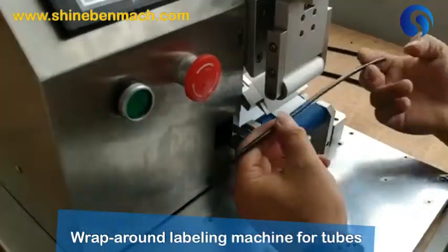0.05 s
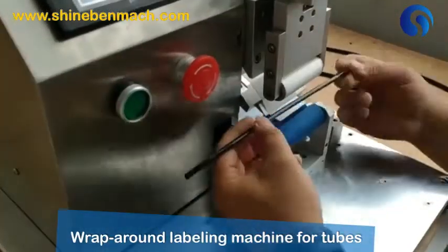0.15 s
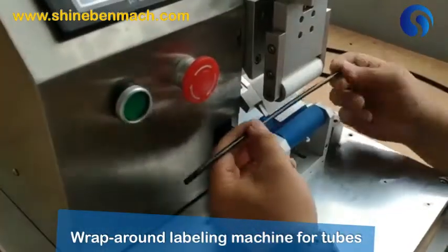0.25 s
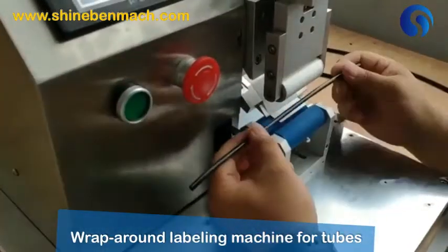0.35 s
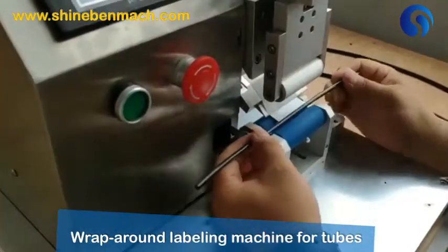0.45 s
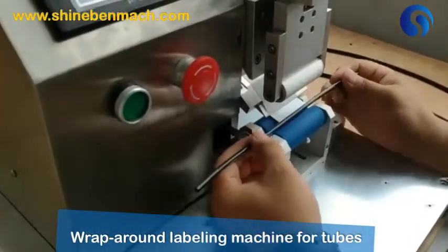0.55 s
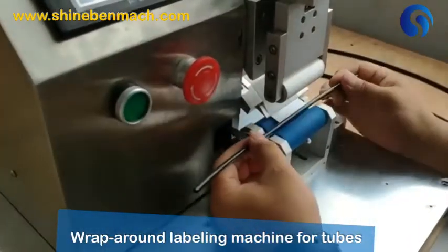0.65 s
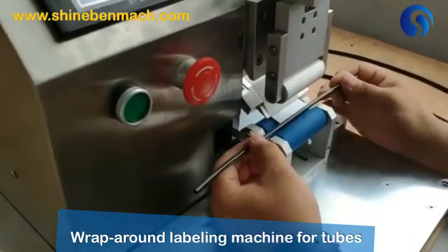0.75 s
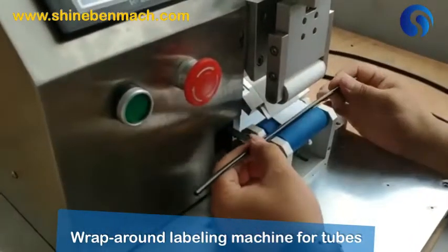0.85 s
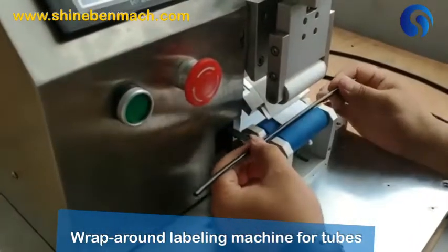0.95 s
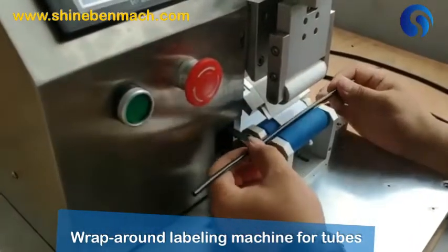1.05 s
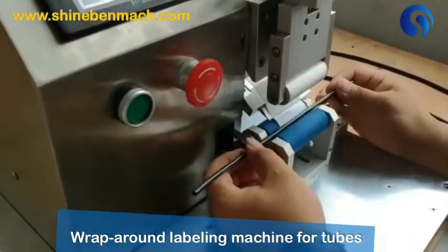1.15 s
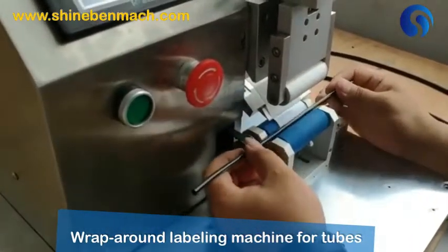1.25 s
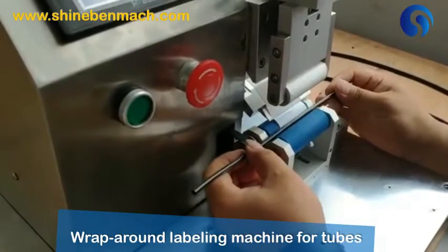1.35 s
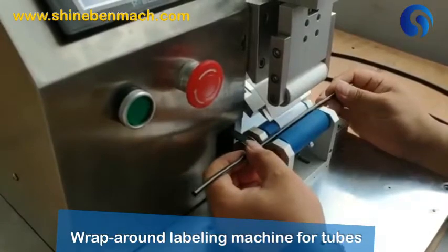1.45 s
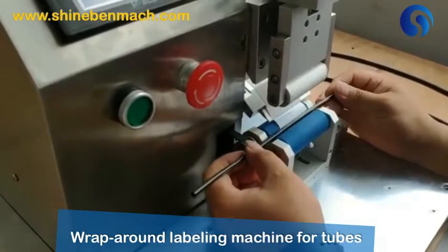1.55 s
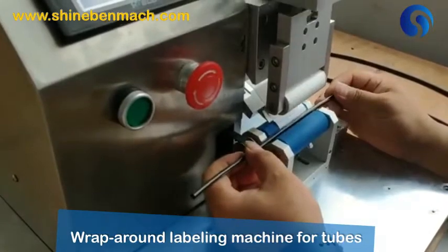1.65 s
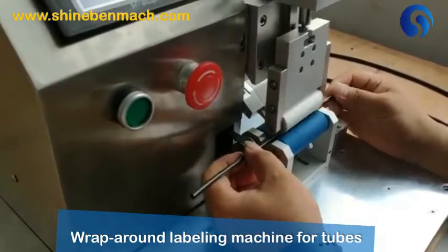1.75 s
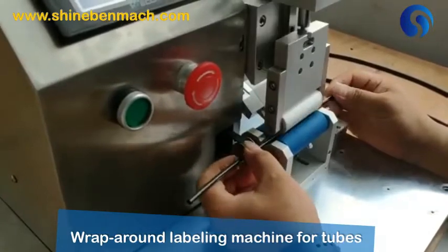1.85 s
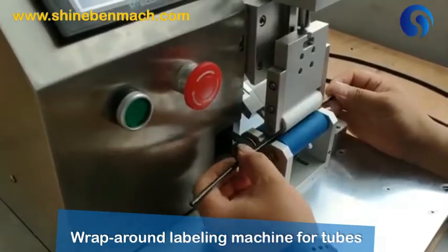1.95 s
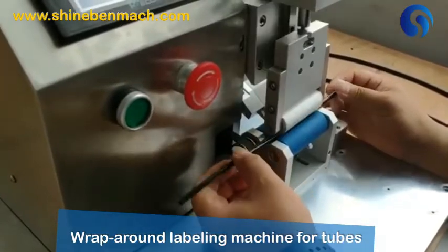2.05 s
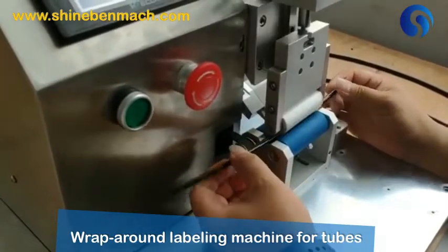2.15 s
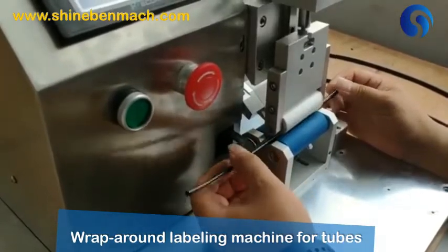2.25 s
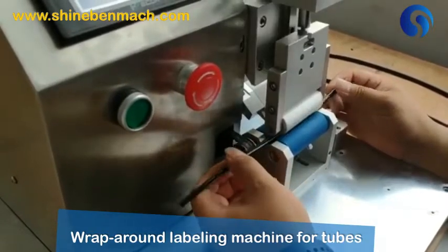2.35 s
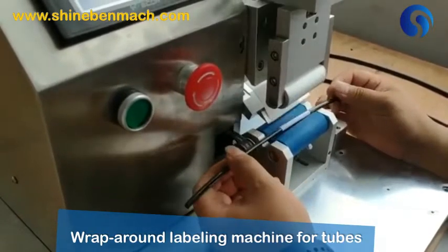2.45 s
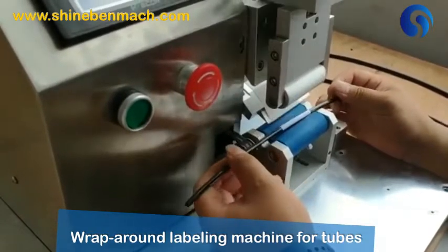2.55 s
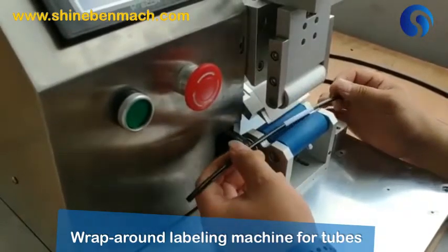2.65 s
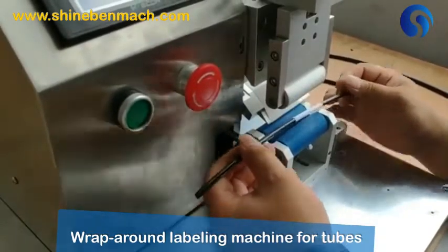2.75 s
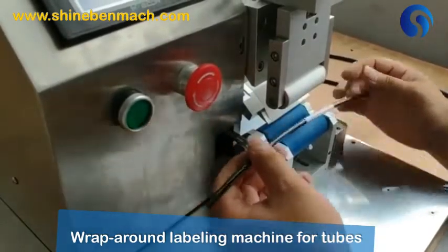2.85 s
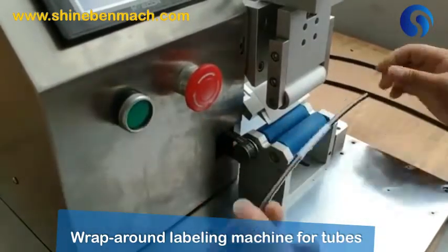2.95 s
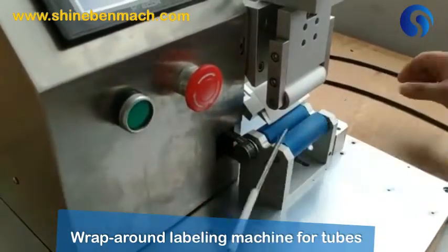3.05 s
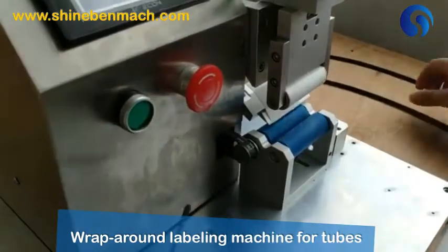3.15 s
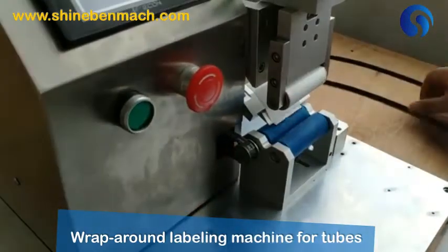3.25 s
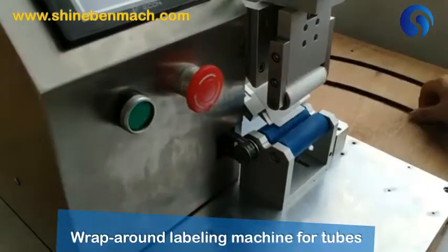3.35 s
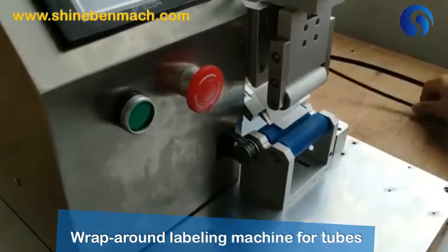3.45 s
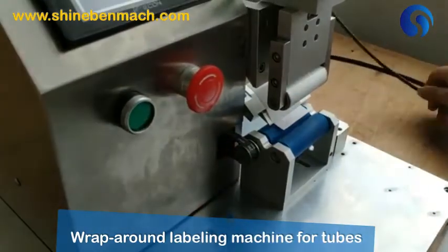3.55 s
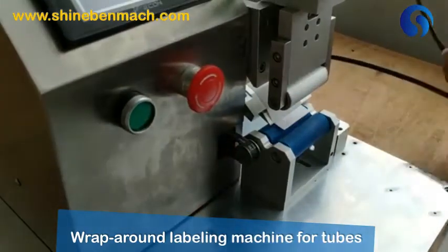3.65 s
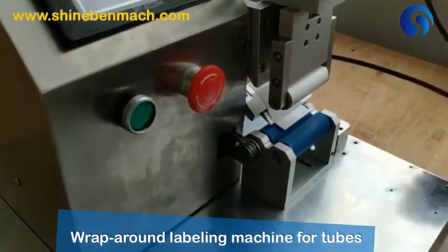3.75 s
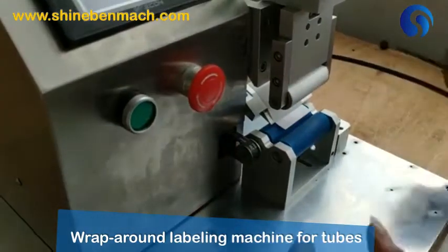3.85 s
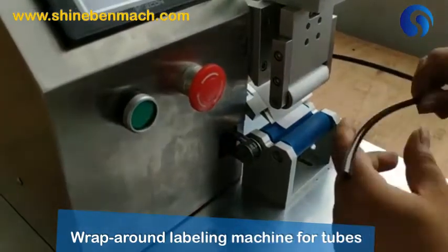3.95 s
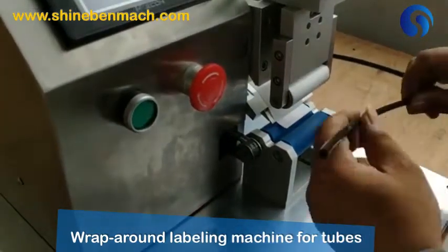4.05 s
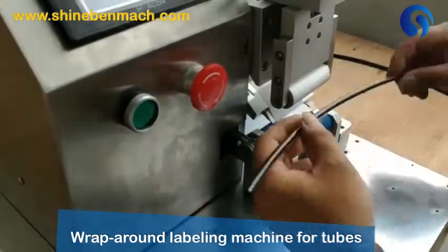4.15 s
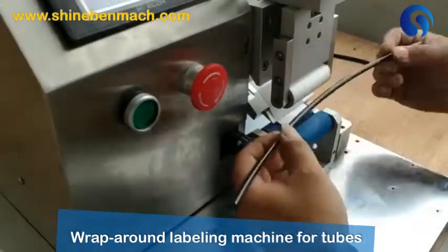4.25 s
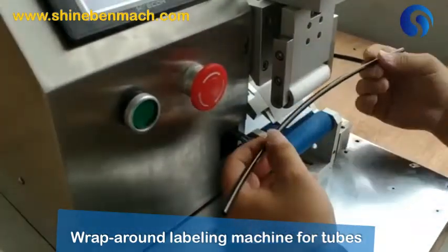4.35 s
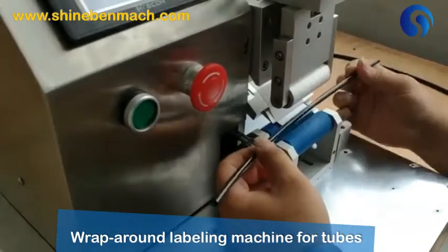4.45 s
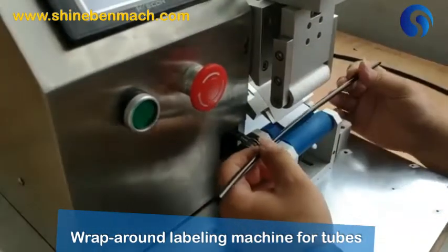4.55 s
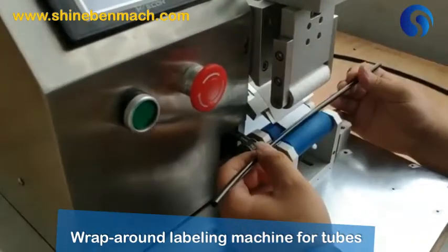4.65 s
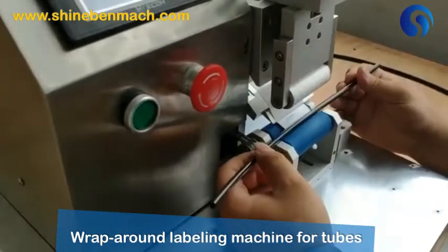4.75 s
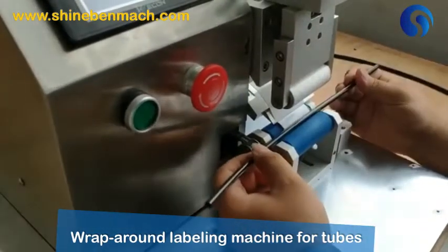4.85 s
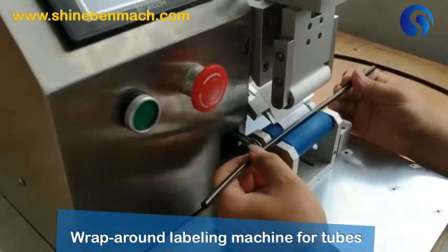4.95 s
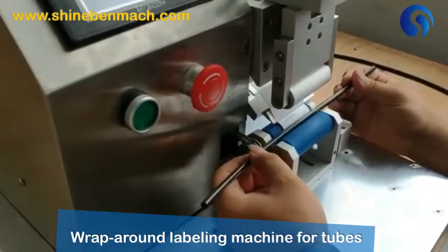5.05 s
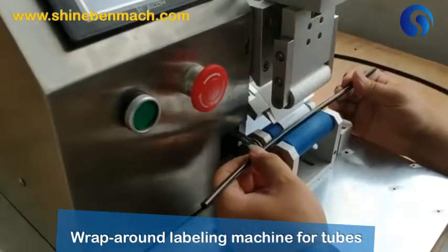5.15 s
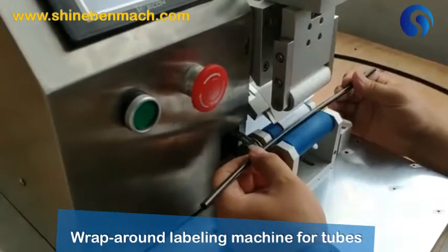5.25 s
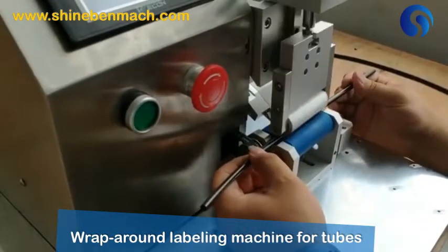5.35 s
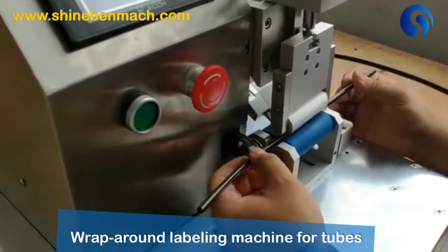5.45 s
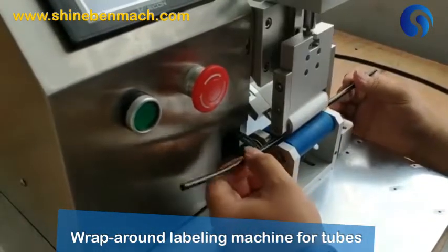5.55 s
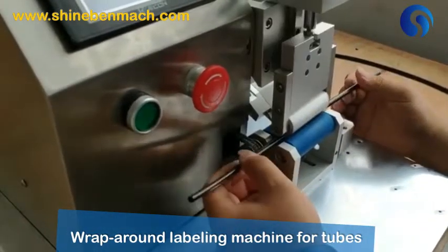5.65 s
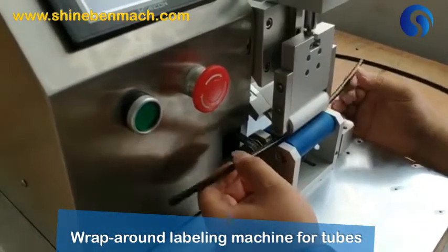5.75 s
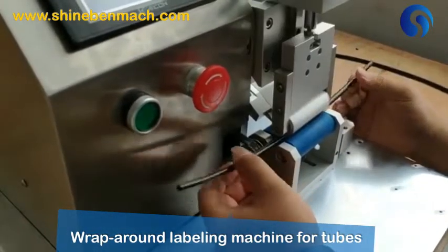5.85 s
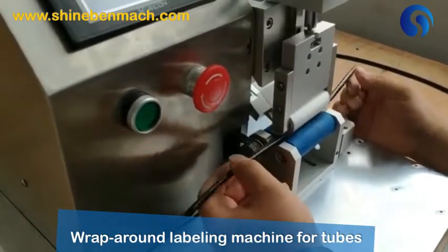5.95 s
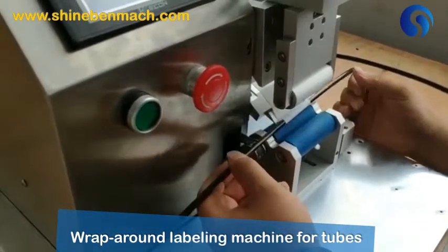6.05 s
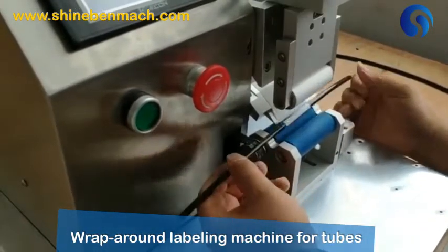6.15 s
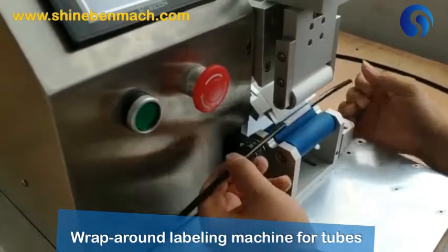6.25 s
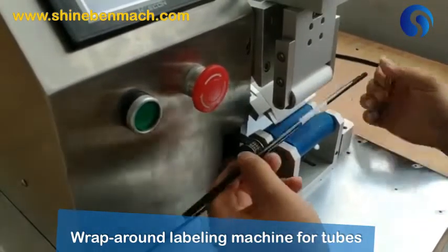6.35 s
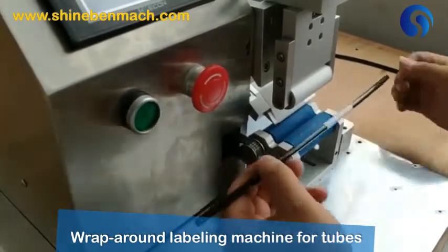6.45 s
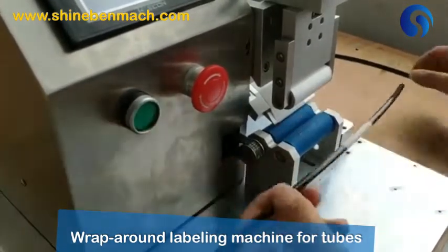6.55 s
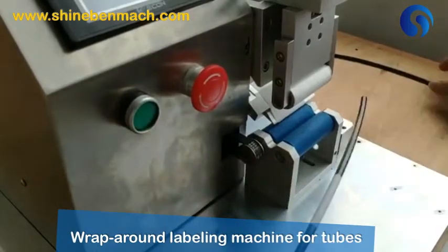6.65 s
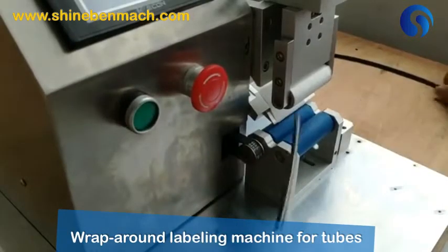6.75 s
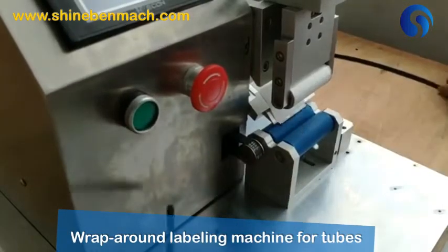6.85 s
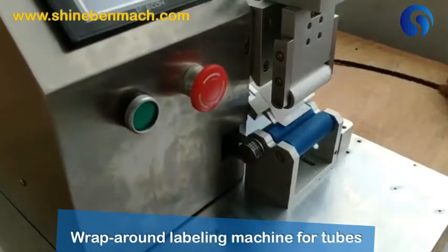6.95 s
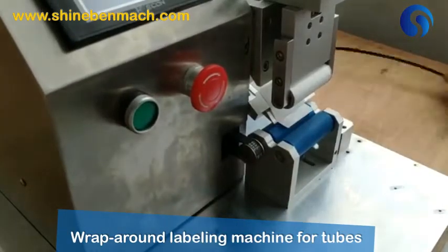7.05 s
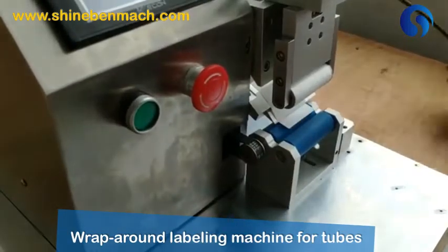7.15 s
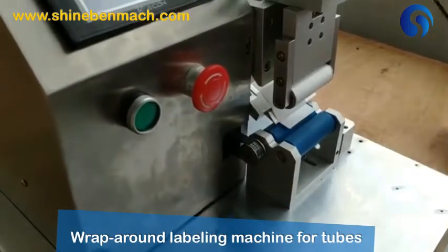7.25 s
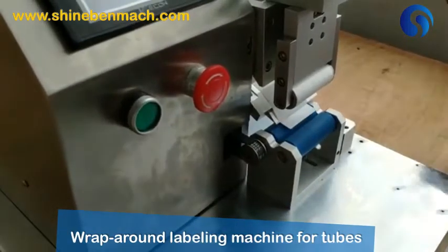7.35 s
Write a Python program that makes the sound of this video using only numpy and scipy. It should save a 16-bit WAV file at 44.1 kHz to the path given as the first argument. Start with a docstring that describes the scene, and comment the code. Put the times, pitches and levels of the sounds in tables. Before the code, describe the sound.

Two cycles of an air-driven metal press: sharp clack and fading rush of air, then clack, lift and vent, with light tube scuffs over workshop hiss.

```python
"""Steady factory hiss and hum, with light scuffs and soft bumps of tubes; a labeling machine runs two cycles.
A switch ticks, air rushes out, the pressing head clacks down; the cylinder lifts it again and vents.
Air is coloured, patchy noise under pressure-like envelopes; metal is short blows ringing modes.
Ticks are clicks through resonators; scuffs and bumps are swelling noise bands; hum is wavering sines."""
import sys
import numpy as np
from scipy import signal
from scipy.fft import rfft, irfft, next_fast_len
from scipy.io import wavfile
from scipy.ndimage import uniform_filter1d

SR = 44100
rng = np.random.default_rng(int(sys.argv[2]) if len(sys.argv) > 2 else 0)


def persist_wave(psi):
    """Save psi, clipped to +-1, as 16-bit WAV."""
    counts = np.round(np.clip(psi, -1, 1) * 32767).astype(np.int16)
    wavfile.write(sys.argv[1], SR, np.atleast_2d(counts).T)


N = 326781
TIME_S = np.arange(N) / SR
CUTOFF_HZ = 7560

# All levels are those ahead of the gain control.
# Head strokes down: valve_opens_s, head_lands_s, valve_clack_db, landing_blow_db
DOWN_STROKES = [(1.731, 1.8456, -1, -3), (5.284, 5.39, -3, -17.5)]
# Head strokes up: valve_opens_s, head_meets_top_stop_s, valve_clack_db, stop_blow_db
UP_STROKES = [(2.4337, 2.528, -1, -1), (6.008, 6.101, -2.5, -3.5)]

# Relative spectra of the three air flows: freq_hz, density_db_per_hz
DOWN_SPECTRUM = [(90, -58), (240, -17), (480, -9.5), (800, -11.5), (1200, 2.5), (2000, -3), (2550, -5.5),
                 (2850, -1), (4300, -1.5), (5200, -5.5), (6100, -17), (7400, -2.5)]
UP_SPECTRUM = [(90, -36.5), (300, -15), (700, -12.5), (1250, 0.5), (1650, 2), (2300, -3.5), (3000, -0.5),
               (3800, -3.5), (4250, 6.5), (4900, -5.5), (6100, -18.5), (7400, 0.5)]
VENT_SPECTRUM = [(90, -71.5), (220, -14.5), (700, 0), (1000, 4), (1900, -1.5), (2700, 1.5), (4100, -5),
                 (4900, -13), (6100, -19), (7400, -11.5)]
# Exhaust path resonances, down and up: centre_hz, width_hz, lift_db
DOWN_PORT_RESONANCES = [(510, 48, 7), (1120, 60, -5), (1400, 21, 0.5), (1630, 28, -3.5), (1995, 40, 6.5),
                        (2320, 130, 7.5), (2870, 37, 9.5), (3140, 39, 6.5), (3376, 87, 9), (3840, 32, -5),
                        (3670, 52, 6), (4206, 130, 8.5), (4830, 76, 1), (5700, 90, 2.5)]
UP_PORT_RESONANCES = [(454, 24, 7.2), (890, 110, 9.3), (1084, 35, 2.6), (1242, 40, 8.1), (1780, 40, 3.4),
                      (1880, 27, 1.6), (2300, 170, 10), (3380, 140, 2.3), (3350, 30, 4.6), (3540, 40, 5.7),
                      (3690, 54, 4.9), (3890, 160, 4.2), (3940, 60, 3.9), (5300, 42, 14)]
# Vent after each lift, timed from the top stop
VENT_START_S, VENT_TOP_S, VENT_DB, VENT_FALL_DB_PER_S = 0.025, 0.065, -14.5, 51

# Hisses as the down valve cracks open and the feed stops: delay_s, level_db, centre_hz, half_length_s
DOWN_HISSES = [(-.006, -18, 5200, .007), (0.372, -28, 5700, .008)]
# Hiss as the up valve gap widens: delay_s, level_db, centre_hz, half_length_s
UP_HISSES = [(-.008, -11, 5200, 0.0076)]
# Last air squeezed out, low puff of the vent: delay_s, level_db, centre_hz, half_length_s
TOP_STOP_PUFFS = [(-.001, -3.5, 8260, 0.008), (0.036, -26, 238, 0.03)]
# Thinner hiss as the valve first cracks open before each lift: lead_s, level_db
LIFT_VALVE_CRACKS = [(.021, -19), (0.0077, -15)]
CRACK_HZ, CRACK_HALF_S = 5900, 0.0036

# Modes of head and frame: freq_hz, relative_level_db, t60_s
HEAD_MODES = [(226, -3.5, .1), (309, 12.5, 0.046), (387, -4, 0.23), (528, 5.5, 0.091), (1099, -7, 0.13),
              (1139, 5.5, 0.073), (1368, 1.5, 0.059), (1670, -2, 0.093), (2230, -8, 0.023),
              (2850, -3.5, 0.083), (3190, -12, .12), (3930, -8.5, 0.11)]
# Pilot knock, main clack of the down valve: delay_s, level_re_clack_db, centre_hz, t60_s
DOWN_VALVE_CONTACTS = [(-.027, -12.5, 678, 0.079), (0, 1.5, 1210, 0.014)]
# Blow, rebound, thud of the frame: delay_s, level_re_blow_db, centre_hz, t60_s
LANDING_CONTACTS = [(0, 6, 1760, 0.017), (.0054, 2.5, 1360, 0.028), (.015, -13, 453, .17)]
# Pilot knock, main clack of the up valve: delay_s, level_re_clack_db, centre_hz, t60_s
UP_VALVE_CONTACTS = [(-.008, -13, 479, 0.088), (0, -1, 1450, 0.081)]
# Blow, thud of the frame at the top: delay_s, level_re_blow_db, centre_hz, t60_s
TOP_STOP_CONTACTS = [(0, 1, 2500, .021), (.006, -13, 610, .065)]
# Label feed stops, timed from the down valve: delay_s, level_db, centre_hz, t60_s
FEED_STOP_CONTACTS = [(.386, -5, 2170, 0.042)]

# Switch ticks and light taps: start_s, click_db
TICK_TIMES = [(.3420, 0.5), (3.6494, -12.5), (3.8358, -20), (4.4930, 1), (4.7767, -3), (6.973, -10),
              (7.3157, -11.5), (7.399, -8)]
# Modes of the ticking parts: freq_hz, relative_level_db, t60_s
TICK_RESONANCES = [(2760, -3, 0.006), (3020, 0.5, 0.0037), (2490, -12, 0.0078), (3730, -6.5, 0.0081),
                   (5000, -17.5, 0.0099), (7250, -15.5, 0.011)]
LANDING_TICK_DB, LANDING_TICK_DELAY_S = 1.5, .002  # roller snaps against the tube
# A part slides as it ticks: delay_s, level_re_tick_db, centre_hz, half_length_s
TICK_SLIDES = [(.002, -28.5, 4900, 0.012)]

# Tube rumble on the rollers, one value a cycle: level_db
ROLLING_LEVELS_DB = [-32, -45.5]
# Tube scuffs on bench or rollers: start_s, level_db, centre_hz, rasp_level_db
TUBE_SCUFFS = [(.045, -29, 1020, -58), (2.043, -19, 3870, -41), (3.652, -19, 2250, -30.5),
               (3.836, -26.5, 2370, -51), (6.979, -24, 2680, -45), (7.317, -21.5, 2580, -31),
               (7.401, -17, 3720, -15.5)]
# Handling bumps: start_s, level_db, centre_hz
HANDLING_BUMPS = [(.048, -28, 414), (4.13, -31, 220), (4.376, -34, 239), (4.472, -34, 174),
                  (5.726, -25, 224), (5.845, -27, 187), (7.325, -31, 337)]
SCUFF_HALF_S, BUMP_HALF_S = 0.014, .012
RASP_HZ, RASP_LEAD_S, RASP_HALF_S = 7400, .006, 0.012

# Relative spectrum of the factory floor: freq_hz, density_db_per_hz
FLOOR_SPECTRUM = [(50, -51), (110, -32), (160, -15), (225, -2), (380, -3.5), (850, 0), (1500, -1),
                  (2700, -3), (4100, -10), (4800, -18), (6200, -26), (6950, -25), (7350, -17), (7700, -11)]
# Casing and workshop resonances: centre_hz, width_hz, lift_db
CASING_RESONANCES = [(276, 20, 2), (424, 14, 5.5), (543, 110, 2.5), (790, 7.8, 5.5), (876, 36, 3),
                     (1100, 41, 1.5), (1240, 49, 1.5), (1690, 200, 2), (2640, 74, 1)]
# Motor hum: freq_hz, rms_db
HUM_LINES = [(264, -49), (447, -52.5), (529, -53.5)]
FLOOR_DB = -28.5

ROOM_T60_S, ROOM_DB = 0.62, -10
GAIN_THRESHOLD_DB, GAIN_SHARE = -18, 0.35  # share of the excess removed
GAIN_WINDOW_S, GAIN_ATTACK_S, GAIN_RECOVERY_DB_PER_S = .02, .008, 2


def exhaust(strokes, spectrum, port, flow_db, surge_db, fall_db_per_s, lag_s, rise_db_per_s,
            surge_s, settle_s, dulling_db_per_s):
    """Air surges as the valve opens, flows evenly during travel, then dies and dulls with the pressure."""
    jet = noise(spectrum, port, patchy_db=2.5)
    dull = signal.sosfiltfilt(signal.butter(4, 4900, fs=SR, output="sos"), jet)
    treble = jet - dull
    out = np.zeros(N)
    for opens_s, lands_s, _, _ in strokes:
        start_s = opens_s + lag_s
        early_s = np.maximum(start_s - TIME_S, 0)
        late_s = np.maximum(TIME_S - lands_s, 0)
        surge = np.clip(1 - (TIME_S - start_s - surge_s) / settle_s, 0, 1)
        level_db = flow_db + surge_db * surge - rise_db_per_s * early_s - fall_db_per_s * late_s
        out += from_db(level_db) * (dull + treble * from_db(-dulling_db_per_s * late_s))
    return out


def venting(swell_db=3):
    """With the head at the top, the remaining air leaves in a duller, fading rush."""
    times_s = [VENT_START_S - .01, VENT_START_S, VENT_TOP_S, VENT_TOP_S + 2]
    levels_db = [-150, VENT_DB - swell_db, VENT_DB, VENT_DB - 2 * VENT_FALL_DB_PER_S]
    flow = np.zeros(N)
    for _, stops_s, _, _ in UP_STROKES:
        flow += from_db(np.interp(TIME_S - stops_s, times_s, levels_db))
    return flow * noise(VENT_SPECTRUM, CASING_RESONANCES, patchy_db=3.0)


def spits():
    """Brief narrow-band hisses and puffs as valves crack open and strokes end."""
    rows = []
    for opens_s, _, _, _ in DOWN_STROKES:
        rows += after(opens_s, 0, DOWN_HISSES)
    for (opens_s, stops_s, _, _), (lead_s, level_db) in zip(UP_STROKES, LIFT_VALVE_CRACKS):
        rows.append((opens_s - lead_s, level_db, CRACK_HZ, CRACK_HALF_S))
        rows += after(opens_s, 0, UP_HISSES) + after(stops_s, 0, TOP_STOP_PUFFS)
    return swells(rows, spread=1.12)


def clacks(rows, spread=2.08, blow=1.23, cycles=2.2, ring_db=-39):
    """Each contact is a blow of a few cycles plus dying chatter, ringing the head modes."""
    out = np.zeros(N)
    age_s = np.arange(SR // 3) / SR
    for start_s, level_db, hz, t60_s in rows:
        fade = from_db(-60 * age_s / t60_s)
        chatter = fade * rng.standard_normal(len(age_s))
        pulse = blow * np.sin(2 * np.pi * hz * age_s) * np.exp(-hz * age_s / cycles) * fade
        force = chatter + pulse
        body = force.copy()
        for mode_hz, mode_db, mode_t60_s in HEAD_MODES:
            body += from_db(mode_db + ring_db) * ring(force, mode_hz, mode_t60_s)
        sound = rms_one(band(body, hz, spread)) * np.sqrt(np.mean(fade ** 2))
        add(out, start_s, from_db(level_db) * sound)
    return out


def contacts():
    """Metal contacts of every stroke: valve and end of travel."""
    rows = []
    for opens_s, lands_s, valve_db, blow_db in DOWN_STROKES:
        rows += after(opens_s, valve_db, DOWN_VALVE_CONTACTS) + after(lands_s, blow_db, LANDING_CONTACTS)
    for opens_s, stops_s, valve_db, blow_db in UP_STROKES:
        rows += after(opens_s, valve_db, UP_VALVE_CONTACTS) + after(stops_s, blow_db, TOP_STOP_CONTACTS)
    return clacks(rows)


def feed_stops():
    """The label feed stops with a drier click that barely rings the head."""
    rows = []
    for opens_s, _, _, _ in DOWN_STROKES:
        rows += after(opens_s, 0, FEED_STOP_CONTACTS)
    return clacks(rows, spread=2.4, ring_db=-49)


def ticks(contact_hz=2800, spread=1.34):
    """Small hard parts snap: band-limited clicks ring modes for some milliseconds."""
    landings = [(lands_s + LANDING_TICK_DELAY_S, LANDING_TICK_DB) for _, lands_s, _, _ in DOWN_STROKES]
    clicks = np.zeros(N)
    for start_s, click_db in TICK_TIMES + landings:
        add(clicks, start_s, from_db([click_db]))
    clicks = band(clicks, contact_hz, spread, order=1)
    return sum(from_db(db) * ring(clicks, hz, t60_s) for hz, db, t60_s in TICK_RESONANCES)


def rolling(centre_hz=420, spread=2.08, ramp_s=.08):
    """Dull noise rumble while the head holds the tube on the turning rollers, landing to lift."""
    grip = np.zeros(N)
    for down, up, level_db in zip(DOWN_STROKES, UP_STROKES, ROLLING_LEVELS_DB):
        inside_s = np.minimum(TIME_S - down[1], up[0] - TIME_S)
        grip += from_db(level_db) * np.clip(inside_s / ramp_s, 0, 1)
    rumble = band(patchy(rng.standard_normal(N), 3.0), centre_hz, spread, order=3)
    return grip * rms_one(rumble)


def handling():
    """Tubes scuff, each led by a thin rasp; ticking parts slide; hands bump the bench."""
    scuffs = [(s, db, hz, SCUFF_HALF_S) for s, db, hz, _ in TUBE_SCUFFS]
    rasps = [(s - RASP_LEAD_S, rasp_db, RASP_HZ, RASP_HALF_S) for s, _, _, rasp_db in TUBE_SCUFFS]
    slides = [row for s, db in TICK_TIMES for row in after(s, db, TICK_SLIDES)]
    bumps = [(s, db, hz, BUMP_HALF_S) for s, db, hz in HANDLING_BUMPS]
    return swells(scuffs, spread=1.3) + swells(rasps + slides, spread=1.14) + swells(bumps, spread=1.1)


def factory(hum_waver_db=4, wander_hz=3.5):
    """Broad hiss of fans and air, with motor lines wavering in level and pitch."""
    hiss = noise(FLOOR_SPECTRUM, CASING_RESONANCES, patchy_db=3.5) * from_db(FLOOR_DB)
    hum = np.zeros(N)
    for hz, rms_db in HUM_LINES:
        gain = from_db(rms_db + hum_waver_db * drift(7))
        phase = 2 * np.pi * np.cumsum(hz + wander_hz * drift(15)) / SR
        hum += np.sqrt(2) * gain * np.sin(phase)
    return hiss + hum


def room(x, near_db, near_t60_s):
    """Quick reflections off bench and casing, then the workshop's soft tail, as decaying noise."""
    age_s = np.arange(SR // 2) / SR
    decay = from_db(-60 * age_s / [[near_t60_s], [ROOM_T60_S]]) * (age_s > .002)
    near, far = rng.standard_normal((2, len(age_s))) * decay
    echo = from_db(near_db) * near / np.linalg.norm(near)
    echo += from_db(ROOM_DB) * far / np.linalg.norm(far)
    return x + signal.fftconvolve(x, echo)[:N]


def noise(spectrum, resonances, patchy_db):
    """Rushing noise: smooth spectrum plus narrow resonances, unit rms."""
    size = next_fast_len(N)
    hz = np.maximum(np.fft.rfftfreq(size, 1 / SR), 1)
    points_hz, levels_db = np.transpose(spectrum)
    gain_db = np.interp(np.log(hz), np.log(points_hz), levels_db)
    for centre_hz, width_hz, lift_db in resonances:
        gain_db = gain_db + lift_db / (1 + (2 * (hz - centre_hz) / width_hz) ** 2)
    white = patchy(rng.standard_normal(N), patchy_db)
    shaped = rfft(white, size) * from_db(gain_db) * (hz < CUTOFF_HZ)
    return rms_one(irfft(shaped, size)[:N])


def patchy(x, depth_db, size=2048):
    """Turbulence: narrow bands swell and sink separately within hundredths of a second."""
    cells = signal.stft(x, nperseg=size, noverlap=3 * size // 4)[2]
    wander = uniform_filter1d(rng.standard_normal(cells.shape), size=5, axis=0)  # across frequency
    wander = uniform_filter1d(wander, size=3, axis=1)  # across time
    cells = cells * from_db(depth_db * np.clip(rms_one(wander), -2, 2))
    return signal.istft(cells, nperseg=size, noverlap=3 * size // 4)[1][:N]


def swells(rows, spread):
    """Short bursts of band noise that swell and fade."""
    out = np.zeros(N)
    age_s = np.arange(-SR // 8, SR // 8) / SR
    for centre_s, level_db, hz, half_s in rows:
        shape = 1 / np.cosh(age_s / half_s * np.pi / 2)
        burst = band(rng.standard_normal(len(age_s)), hz, spread) * shape
        sound = rms_one(burst) * np.sqrt(np.mean(shape ** 2))
        add(out, centre_s + age_s[0], from_db(level_db) * sound)
    return out


def ring(x, hz, t60_s):
    """Two-pole resonator: a unit click starts a decaying sine of height 1."""
    radius = from_db(-60 / (t60_s * SR))
    angle = 2 * np.pi * hz / SR
    poles = [1, -2 * radius * np.cos(angle), radius * radius]
    return signal.lfilter([0, np.sin(angle)], poles, x + 1e-18)  # offset avoids denormals


def band(x, hz, ratio, order=2):
    """Band-pass from hz / ratio to hz * ratio."""
    sos = signal.butter(order, [hz / ratio, hz * ratio], "band", fs=SR, output="sos")
    return signal.sosfilt(sos, x + 1e-18)


def drift(knots_per_s):
    """Slow wander: unit-normal random knots joined by lines."""
    count = int(N / SR * knots_per_s) + 2
    return np.interp(TIME_S * knots_per_s, np.arange(count), rng.standard_normal(count))


def after(start_s, level_db, pattern):
    """Rows of a pattern set off at start_s, raised by level_db."""
    return [(start_s + delay_s, level_db + db, hz, length_s) for delay_s, db, hz, length_s in pattern]


def add(out, start_s, sound):
    """Mix a short sound in at start_s."""
    at = int(start_s * SR) + np.arange(len(sound))
    inside = (at >= 0) & (at < N)
    out[at[inside]] += sound[inside]


def from_db(db):
    """Decibels to gain."""
    return 10 ** (np.asarray(db) / 20)


def rms_one(x):
    """Scale to unit rms."""
    return x / np.sqrt(np.mean(x ** 2) + 1e-20)


def gain_control(x):
    """Loud sounds pull the gain down within milliseconds; it creeps back over seconds."""
    power = uniform_filter1d(x ** 2, int(GAIN_WINDOW_S * SR))
    level_db = 10 * np.log10(np.maximum(power, 1e-12))
    excess_db = np.maximum(level_db - GAIN_THRESHOLD_DB, 0)
    recovery_db = GAIN_RECOVERY_DB_PER_S * TIME_S
    # running peak of the cut, released at the recovery rate
    cut_db = np.maximum.accumulate(GAIN_SHARE * excess_db + recovery_db, axis=-1) - recovery_db
    keep = np.exp(-1 / (GAIN_ATTACK_S * SR))
    return x * from_db(-signal.lfilter([1 - keep], [1, -keep], cut_db))


def scene():
    """Air, metal and handling over the factory floor; only metal and ticks get reflections."""
    down = exhaust(DOWN_STROKES, DOWN_SPECTRUM, DOWN_PORT_RESONANCES, flow_db=-12.0, surge_db=6.5,
                   fall_db_per_s=47, lag_s=0.0067, rise_db_per_s=801,
                   surge_s=0.0098, settle_s=0.028, dulling_db_per_s=12.0)
    up = exhaust(UP_STROKES, UP_SPECTRUM, UP_PORT_RESONANCES, flow_db=-12.0, surge_db=4,
                 fall_db_per_s=598, lag_s=-0.001, rise_db_per_s=1190.5,
                 surge_s=0.016, settle_s=0.0108, dulling_db_per_s=23)
    air = down + up + venting() + spits()
    metal = room(contacts() + feed_stops(), near_db=-8.0, near_t60_s=.05)
    snaps = room(ticks(), near_db=-6, near_t60_s=0.03)
    return (air + metal + snaps + rolling() + handling() + factory())[None]


def record(dry):
    """Gain ducks under loud strokes, the highest peaks are rounded off, the treble is cut."""
    held = gain_control(dry)
    rounded = held / (1 + (held / .94) ** 6) ** (1 / 6)
    low_pass = signal.cheby2(16, 50, 1.05 * CUTOFF_HZ, fs=SR, output="sos")
    return signal.sosfiltfilt(low_pass, rounded)


dry = scene()
out = record(dry)
persist_wave(out)
```